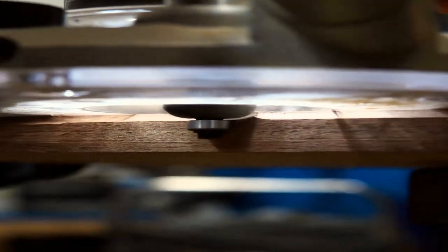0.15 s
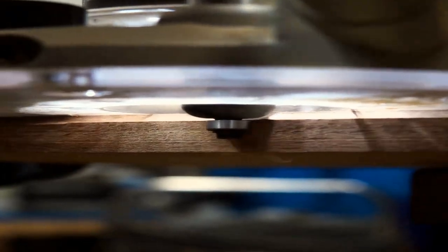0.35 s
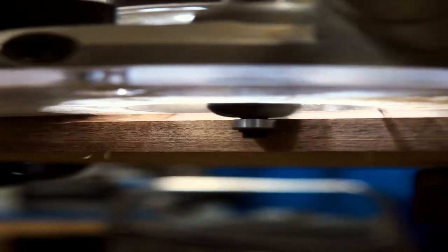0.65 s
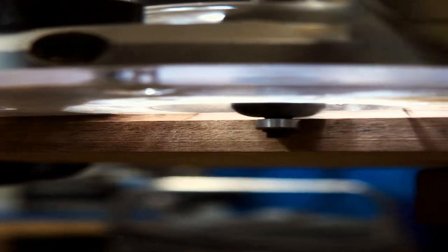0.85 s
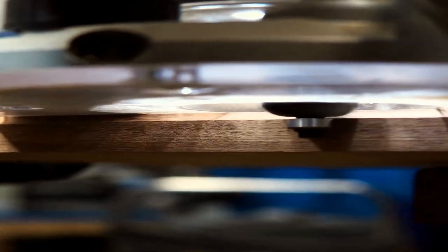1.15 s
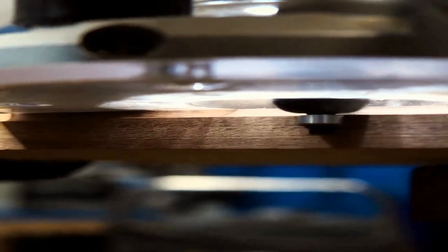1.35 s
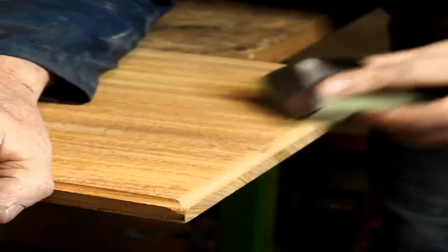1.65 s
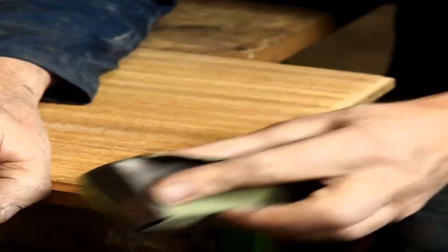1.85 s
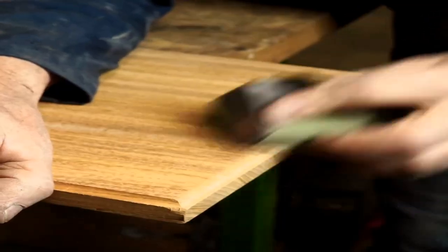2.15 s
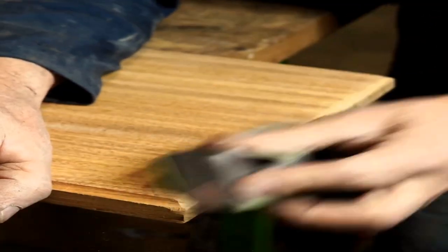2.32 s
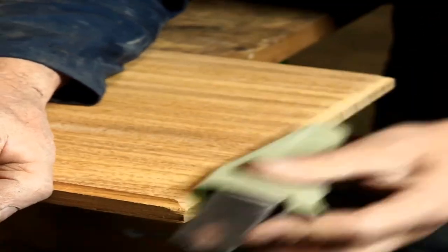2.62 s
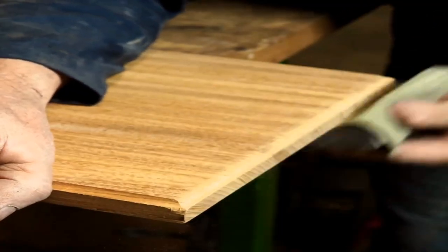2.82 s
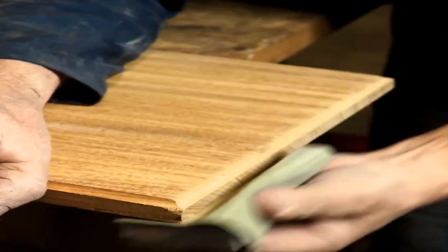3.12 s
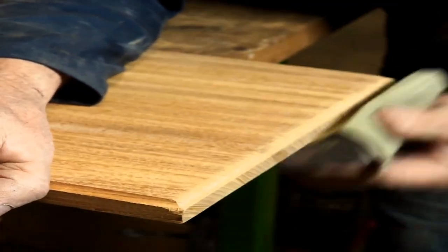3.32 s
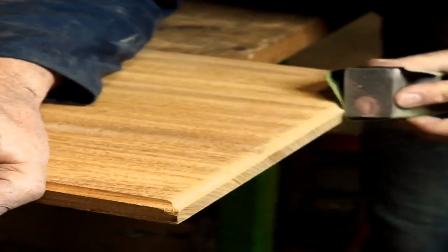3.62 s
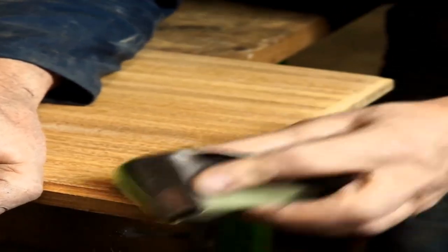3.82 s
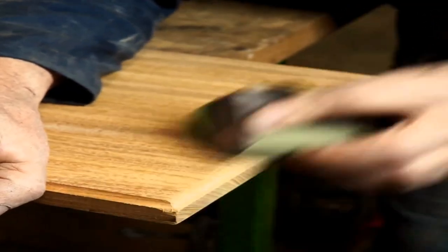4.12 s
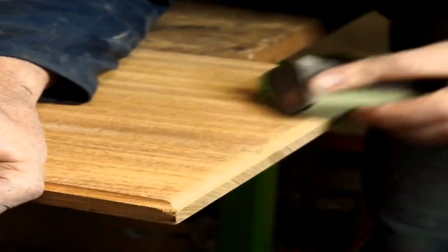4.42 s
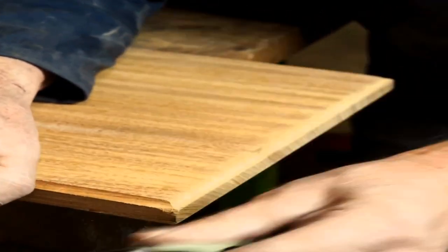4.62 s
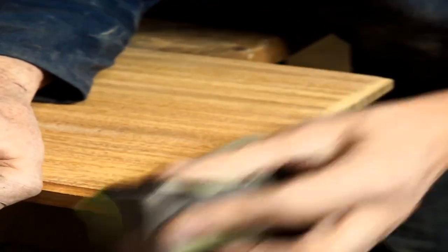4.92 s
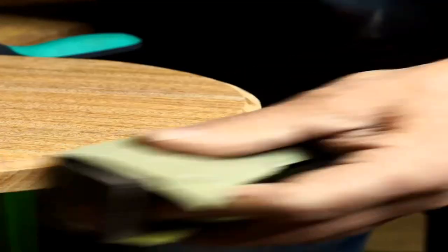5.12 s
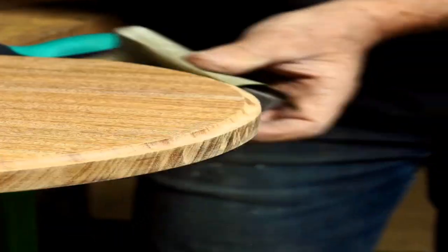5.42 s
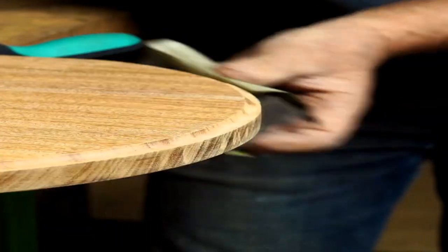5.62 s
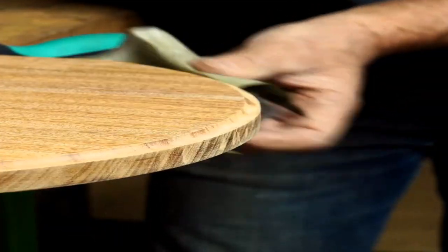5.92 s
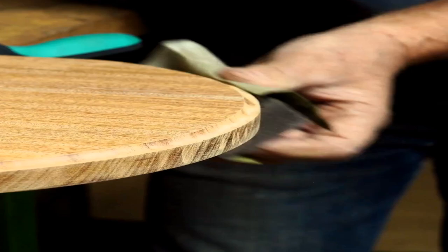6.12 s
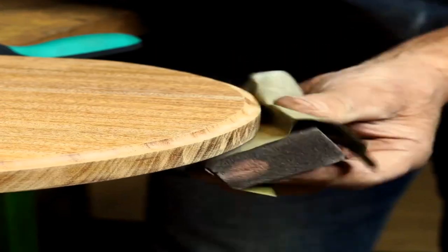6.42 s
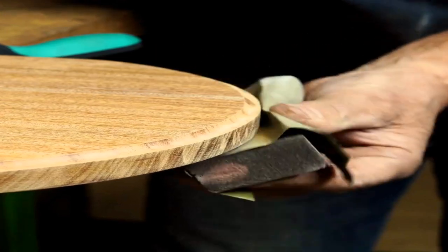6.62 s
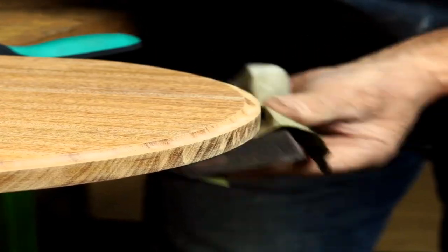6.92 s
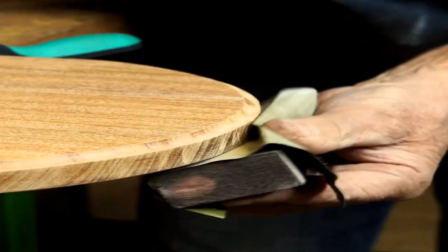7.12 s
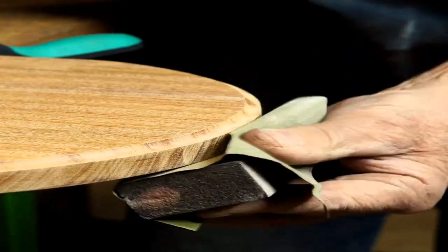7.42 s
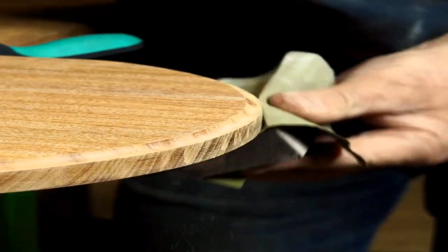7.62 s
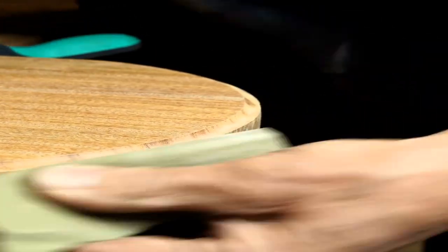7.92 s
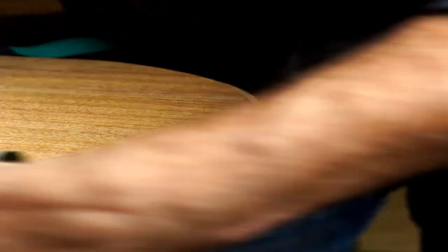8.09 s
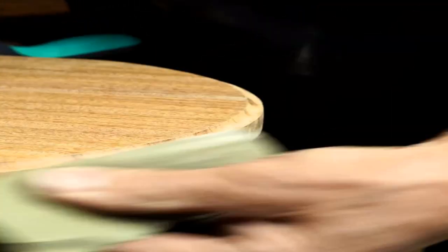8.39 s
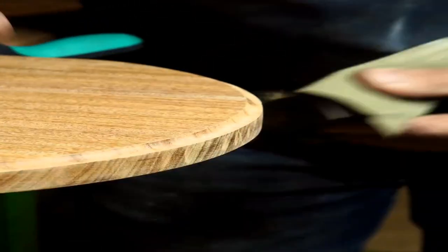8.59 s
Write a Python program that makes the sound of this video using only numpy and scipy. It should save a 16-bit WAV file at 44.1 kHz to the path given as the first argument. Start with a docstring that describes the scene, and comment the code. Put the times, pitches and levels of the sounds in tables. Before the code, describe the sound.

In a quiet workshop with faint low rumble, an electric router whines at a steady pitch with rushing air and buzzing chips, then stops abruptly after about a second. Close up, a sanding block hisses to and fro along a straight wooden edge with soft bumps, then makes quicker, duller, hollow-ringing strokes on a round top, ending with one long sweep and a faint touch.

```python
"""In a workshop with a low rumble, an electric router runs along a wooden edge and stops abruptly.
Then a sanding block rubs to and fro by hand: long hissing strokes on a straight edge, short quick ones
on a round top that rings hollowly, one last long sweep and a light touch.
The router is a stack of spindle harmonics over air noise and pulsed chip clicks; the sanding is random
grain clicks, coloured by paper and wood. The hollow ring glides as the block travels round the curve."""
import sys
import numpy as np
from scipy import signal
from scipy.fft import rfft, irfft, next_fast_len
from scipy.io import wavfile
from scipy.ndimage import uniform_filter1d, map_coordinates

SR = 44100
rng = np.random.default_rng(int(sys.argv[2]) if len(sys.argv) > 2 else 0)


def put_to_file(sound):
    """Save the sound as 16-bit audio at rate SR, in the file named by the first command-line argument."""
    columns = np.atleast_2d(sound).T  # one column per channel
    safe = np.clip(columns, -1, 1)
    whole_steps = np.round(safe * 32767)
    wavfile.write(sys.argv[1], SR, whole_steps.astype(np.int16))


N = 385875
TIME = np.arange(N) / SR   # seconds

# Low rumble of the workshop. Each row: frequency in Hz, relative level in dB per Hz.
RUMBLE_COLOUR = [(15, -40), (30, -12), (80, -7), (200, -7), (400, -14), (1000, -40)]
# Shaking of the bench through the jobs. Each row: time in seconds, relative level in dB.
SHAKE_LEVELS = [(0.0, -79), (.95, -66), (1.15, -59.5), (4.7, -54), (4.82, -51.5), (6.6, -54.5),
                (7.55, -51.5), (7.75, -57), (8.75, -57.5)]
# Low modes of the board on the bench. Each row: frequency in Hz, width in Hz, relative level in dB.
BENCH_MODES = [(75.5, 57, -6), (98.8, 6.5, 4), (138, 29, -7.5)]
# The block bumps the board as it turns.
# Each row: time in seconds, relative thud level in dB, relative scuff level in dB.
BUMPS = [(1.337, -48, -50), (1.74, -35, -59), (1.799, -43, -42.5), (2.02, -48, -46), (2.262, -37, -42),
         (2.801, -29, -47), (3.099, -52, -43.5), (3.18, -34, -60), (3.355, -35, -43.5), (3.745, -35, -37),
         (4.085, -46, -45)]

# Router spindle. Each row: time in seconds, speed in turns per second.
SPINDLE_SPEED = [(0, 240.3), (.15, 240.7), (.3, 240.4), (.77, 240.4), (.92, 239.6), (1.1, 240.3)]
# Lines of motor, fan and cutter, one row for each multiple of the spindle speed from 1 up.
# Each row: relative level alike in both ears in dB, relative level opposed in dB, swell in dB,
# swell period in seconds, loudest moment in seconds, change under the deeper cut in dB.
WHINE_LINES = [(-69.5, -39.0, 3.0, 1.49, 1.0, -5.5), (-45.0, -41.5, 5.0, 1.07, 0.2, -3.5),
               (-40.0, -44.0, 2.5, 1.49, 0.3, 4.0), (-36.5, -31.0, 4.5, 1.49, 0.25, 6.5),
               (-38.0, -40.5, 3.5, 0.62, 0.52, 5.0), (-47.0, -42.5, 3.0, 0.76, 0.67, 14.0),
               (-47.0, -43.0, 4.5, 0.57, 0.03, 0.5), (-42.5, -41.5, 6.0, 1.27, 0.47, 6.5),
               (-43.0, -42.0, 2.0, 0.51, 0.06, -2.0), (-45.0, -45.0, 5.5, 0.47, 0.43, 0.5),
               (-45.0, -46.0, 5.0, 0.59, 0.58, 0.0), (-43.0, -36.0, 5.0, 0.38, 0.2, 0.5),
               (-51.0, -47.0, 4.0, 0.55, 0.21, 8.5), (-40.0, -40.0, 4.0, 0.37, 0.2, -2.5),
               (-45.0, -43.0, 2.5, 1.0, 0.59, 2.5), (-47.0, -39.0, 3.5, 0.42, 0.26, 2.5),
               (-49.0, -42.5, 5.5, 0.84, 0.66, 4.5), (-49.5, -46.0, 2.0, 0.38, 0.18, -3.5),
               (-52.5, -50.5, 4.0, 0.33, 0.19, -1.5), (-54.0, -45.5, 3.5, 0.55, 0.39, -5.0),
               (-49.5, -47.0, 6.0, 1.49, 0.58, 4.0), (-52.5, -53.0, 5.5, 0.89, 0.69, -1.0),
               (-51.0, -57.0, 3.0, 0.25, 0.02, -6.0), (-51.0, -59.0, 5.0, 0.46, 0.24, 0.0)]
# Colour of cooling air and chips. Each row: frequency in Hz, relative level in dB per Hz.
AIR_COLOUR = [(40, -57), (140, -14), (235, -26), (380, -6.5), (580, 0.5), (800, -2), (1250, 2.5),
              (2050, -3.5), (2600, -2), (2950, -7.5), (3300, -1.5), (3700, -10.5), (4400, -6.5), (5000, -2),
              (5600, -7.5), (8000, -8), (9400, -7), (11000, -16.5), (15000, -13)]

# Strokes on the straight edge; each lasts until the next begins. The weak row is the block trailing off # in
# light contact. # Each row: start in seconds, share of the stroke at which it is fastest, then relative levels
# in dB: # rasp, brightness of the rasp, hiss of the grit tips, ring of the board.
STRAIGHT_STROKES = [(1.115, 0.32, -22.5, 2.5, -24, -28), (1.326, 0.44, -20.5, 1, -24, -25.5),
                    (1.562, 0.41, -22, 2.5, -23.5, -32.5), (1.765, 0.5, -20.5, 1, -24, -26.5),
                    (1.997, 0.49, -22.5, 0.5, -21.5, -28.5), (2.196, 0.44, -21, 0.0, -24, -24),
                    (2.414, 0.36, -20.5, 2.5, -27.5, -28.5), (2.612, 0.59, -21, 2.5, -25, -26.5),
                    (2.79, 0.28, -23, 4, -28, -29.5), (2.997, 0.3, -21.5, 2, -28, -28),
                    (3.151, 0.27, -21, 3, -23.5, -27), (3.335, 0.49, -21.5, 0.5, -25.5, -28),
                    (3.524, 0.68, -22.5, 3.5, -23, -27.5), (3.7, 0.49, -21.5, 2.5, -25.5, -27.5),
                    (3.893, 0.38, -21.5, 3, -24, -30), (4.055, 0.4, -21, -0.5, -26, -25.5),
                    (4.421, 0.025, -38.5, -1, -51.5, -36.5), (4.536, 0.27, -22.5, -0.5, -26.5, -25.5)]
# Strokes on the round top: a slow one, a quick run, two long sweeps, a weak row as the block trails off #
# lightly, a light touch. # Each row: start in seconds, share of the stroke at which it is fastest, then
# relative levels in dB: # rasp, brightness of the rasp, hiss of the grit tips, ring of the board.
ROUND_STROKES = [(4.725, 0.27, -28.5, -1.5, -28, -26.5), (5.168, 0.34, -26.5, 0.5, -26.5, -24.5),
                 (5.285, 0.67, -24, -2.5, -24.5, -22.5), (5.376, 0.61, -26.5, -1, -27.5, -22.5),
                 (5.489, 0.5, -26.5, 0, -25, -22), (5.58, 0.66, -25.5, -1.5, -26, -23),
                 (5.679, 0.48, -27.5, -1, -29, -26), (5.787, 0.55, -28, -2, -28, -24.5),
                 (5.899, 0.36, -30, -0.5, -30.5, -25), (6.011, 0.58, -25.5, -1.5, -23.5, -23.5),
                 (6.1, 0.53, -27, -1, -25.5, -20), (6.218, 0.75, -29, -2.5, -25.5, -22.5),
                 (6.328, 0.32, -27, -0.5, -26, -19.5), (6.451, 0.72, -24.5, -2, -25, -18),
                 (6.555, 0.34, -26, -0.5, -24.5, -21.5), (6.685, 0.54, -25, -1.5, -25, -21.5),
                 (6.823, 0.21, -24.5, -1.5, -25, -23), (6.975, 0.61, -22.5, -0.5, -21, -19.5),
                 (7.131, 0.45, -25.5, -1.5, -27, -24.5), (7.272, 0.68, -28.5, 0, -26, -20),
                 (7.888, 0.56, -22.0, -0.5, -24.5, -25), (8.269, 0.05, -38, -1.5, -47, -40.5),
                 (8.45, 0.28, -41.5, -2, -42, -42.5)]
# Colour of paper on wood at each edge. Each row: frequency in Hz, relative level in dB per Hz.
STRAIGHT_COLOUR = [(1900, -2), (2400, 0.5), (4100, 4.5), (5000, -1.5), (8000, -1.5), (9300, -4),
                   (11300, -7), (14000, -8), (15400, -11)]
ROUND_COLOUR = [(1900, 0), (2400, 0), (3500, 0.5), (4800, -3.5), (7000, -6.5), (9100, -10.5),
                (11300, -12.5), (15400, -14)]
# Resonances of board and block, before they glide.
# Each row: frequency in Hz, width in Hz, relative level in dB.
STRAIGHT_MODES = [(1510, 530, 1.5), (1930, 330, 4.5)]
ROUND_MODES = [(1403, 536, -7.5), (1598, 175, 1), (1794, 270, -2)]
# Lower resonances of the board, hollow and low. Each row: frequency in Hz, width in Hz, relative level in dB.
HOLLOW_MODES = [(600, 366, -1.5), (760, 176, 3), (1120, 690, -1.5)]
LOW_MODES = [(313, 43, 1.5), (394, 49, 0), (516, 61, 8)]
# Lower resonances of the board as the work goes on.
# Each row: time in seconds, relative hollow rub in dB, relative low rub in dB.
STRAIGHT_RUB = [(1.1, -40.5, -49), (1.4, -35.5, -50.5), (1.7, -39.5, -49), (2.1, -38.5, -49.5),
                (2.3, -36.5, -48), (2.55, -41, -51), (4.0, -44, -52), (4.33, -37.5, -40), (4.49, -52, -68),
                (4.6, -44, -49.5)]
ROUND_RUB = [(4.74, -41.5, -50), (5.1, -37, -51.5), (5.22, -36, -43), (6.05, -36.5, -44),
             (7.3, -36.5, -46.5), (7.68, -32, -45), (7.8, -36.5, -49.5), (7.87, -38, -47), (7.96, -29, -45),
             (8.2, -42.5, -48), (8.45, -62, -64), (8.75, -53, -66)]
# The hollow between block and board sings as the hand travels round the curve.
# Each row: time in seconds, pitch in Hz, relative level in dB.
HOLLOW_RING = [(4.76, 1669, -31.5), (4.94, 1622, -22.5), (5.1, 1611, -24.5), (5.16, 1000, -46),
               (5.22, 779, -33), (5.35, 956, -39.5), (5.95, 950, -38), (6.2, 1253, -36), (7.0, 1513, -30.5),
               (7.1, 1550, -22), (7.28, 1246, -36), (7.47, 1049, -42), (7.68, 600, -34), (7.8, 400, -46),
               (7.87, 558, -52), (7.93, 676, -28.5), (8.0, 721, -37), (8.025, 1410, -22), (8.13, 1750, -41),
               (8.35, 2010, -55), (8.5, 1930, -55), (8.62, 1860, -46), (8.75, 1830, -54)]

ROUTER_STOP_S, STRAIGHT_END_S, ROUND_END_S = 1.095, 4.74, 8.8
DEEPER_CUT_S = 0.86   # the cutter bites deeper from here on
STUMBLE_S = 0.185   # the odd lines drop out for an instant
LULL_S, LULL_WIDTH_S, LULL_DB = 0.83, 0.023, -5   # lines 3 to 6 dip just before the deeper cut
SWELL_DB, SWELL_PERIOD_S = 8, 0.405   # swell of the faint lines above the table
BEARING_ORDER, BEARING_DB = 10.37, -50   # a bearing sings between two harmonics; relative level
CUTOFF_HZ = 15760   # top of the treble


def from_db(db):
    """Decibels to gain."""
    return 10 ** (np.asarray(db) / 20)


def rms_one(x):
    """Scale to an rms of 1."""
    return x / np.sqrt(np.mean(x ** 2) + 1e-20)


def in_time(rows):
    """Each column of a curve, sample by sample."""
    s, *columns = np.transpose(rows)
    return [np.interp(TIME, s, c) for c in columns]


def between(start, end):
    """One inside the span, with 10 ms ramps at its ends."""
    return np.clip(np.minimum(TIME - start, end - TIME) / .01 + .5, 0, 1)


def drift(rate):
    """Smooth chance with a spread of 1, changing about rate times a second."""
    r = np.exp(-200 * np.pi * rate / SR)   # one step per 100 samples
    noise = rng.standard_normal(N // 100 + 1002)
    slow = signal.lfilter([1], [1, -2 * r, r * r], noise)[1000:]   # drop the filter's start
    return np.interp(np.arange(N) / 100, np.arange(len(slow)), rms_one(slow))


def band(x, low_hz, high_hz, order=2):
    """Butterworth band-pass."""
    edges = [low_hz, min(high_hz, .47 * SR)]
    return signal.sosfilt(signal.butter(order, edges, "band", fs=SR, output="sos"), x)


def coloured(x, spectrum):
    """Shape a sound with a curve of (Hz, dB) points; the highest treble stays level."""
    hz, db = np.transpose(spectrum)
    size = next_fast_len(N)
    bins = np.clip(np.fft.rfftfreq(size, 1 / SR), 1, 14500)
    gain = from_db(np.interp(np.log(bins), np.log(hz), db))
    return irfft(rfft(x, size) * gain, size)[..., :N]


def register(x, low_hz, high_hz):
    """One slice of the spectrum with soft edges, so that neighbouring slices join without a gap."""
    size = next_fast_len(N)
    edges = np.outer([low_hz, high_hz], [.92, 1.08]).ravel()
    gain = np.interp(np.fft.rfftfreq(size, 1 / SR), edges, [0, 1, 1, 0])
    return irfft(rfft(x, size) * gain, size)[..., :N]


def resonate(x, modes):
    """Parallel two-pole resonances of (Hz, width, dB), signs alternating."""
    out = 0
    for k, (hz, width, db) in enumerate(modes):
        r = np.exp(-np.pi * width / SR)
        poles = [1, -2 * r * np.cos(2 * np.pi * hz / SR), r * r]
        gain = (-1) ** k * from_db(db) * (1 - r * r) / 2
        out = out + gain * signal.lfilter([1, 0, -1], poles, x + 1e-18)
    return out


def gliding(x, octaves):
    """Shift a ringing sound up and down in pitch by reading it faster or slower."""
    place = np.cumsum(2 ** octaves) % (N - 1)
    return np.array([map_coordinates(ear, [place], order=3) for ear in x])


def grit(per_s, spread_db):
    """Grains catch and tear fibres: random clicks, mostly small, a few large; one stream for each ear."""
    sizes = from_db(spread_db * np.minimum(rng.exponential(1, (2, N)), 4))
    sizes = sizes * rng.choice([-1, 1], (2, N))
    caught = rng.random((2, N)) < per_s / SR
    return rms_one(sizes * caught / np.sqrt(per_s))


def bench(bump_db, shake_db, lumpy_db, rumble_db):
    """Uneven pushes and soft bumps wake the bench's low modes, over a steady rumble."""
    pushes = np.zeros(N)
    for s, db, _ in BUMPS:
        pushes[int(s * SR)] = from_db(db)
    # resonating twice makes a soft contact: it swells before it fades
    thuds = resonate(resonate(pushes, BENCH_MODES[-1:]), BENCH_MODES[-1:])
    thuds *= pushes.max() / np.abs(thuds).max()
    shoves = rng.standard_normal((2, N)) + 0.22 * rng.standard_normal(N)
    shoves = shoves * from_db(lumpy_db * drift(5.6))
    shake_gain = from_db(in_time(SHAKE_LEVELS)[0] + shake_db)
    shake = shake_gain * rms_one(band(resonate(shoves, BENCH_MODES), 34, 260))
    rumble = rms_one(coloured(rng.standard_normal((2, N)), RUMBLE_COLOUR))
    return from_db(bump_db) * thuds + shake + from_db(rumble_db) * rumble


def workshop(x, wet_db, t60):
    """A weak, dull tail from the walls: decaying band-passed noise, t60 in seconds."""
    t = np.arange(SR // 2) / SR
    tail = band(rng.standard_normal((2, len(t))), 210, 6500, order=1) * from_db(-60 * t / t60)
    tail = rms_one(tail) / np.sqrt(len(t))
    return x + from_db(wet_db) * signal.fftconvolve(x, tail, axes=1)[:, :N]


def scattered(x, longest_s, travel_s, count=7):
    """Echoes off bench, hand and tools, others for each ear; their paths change as the source moves."""
    out = np.zeros((2, N))
    for ear in range(2):
        for delay in rng.uniform(0, longest_s, count):
            lag = np.round((delay + travel_s * drift(2.0)) * SR).astype(int)
            out[ear] += rng.choice([-1, 1]) * x[(np.arange(N) - lag) % N]
    return rms_one(out)


def whine(turns, load, waver, waver_per_order, top_db, top_fall_db):
    """Spindle harmonics swell and fade as the tool travels through its own reflections; a bearing holds
    between them. All waver, the high ones most; the harmonics in the table answer to the load."""
    lines = [(k, *row) for k, row in enumerate(WHINE_LINES, 1)]
    lines.append((BEARING_ORDER, BEARING_DB, BEARING_DB, 0, 1, 0, 0))
    for n, k in enumerate(range(25, 52)):   # faint lines above the table
        faint_db = top_db - top_fall_db * n
        lines.append((k, faint_db, faint_db, SWELL_DB, SWELL_PERIOD_S, rng.random(), 0))
    size = int((ROUTER_STOP_S + .1) * SR)
    t, out = TIME[:size], np.zeros((2, N))
    lull_db = LULL_DB * np.exp(-((t - LULL_S) / LULL_WIDTH_S) ** 2)
    for k, alike_db, opposed_db, swell_db, period_s, loudest_s, cut_db in lines:
        db = swell_db * np.cos(2 * np.pi * (t - loudest_s) / period_s)
        db = db + cut_db * load[:size] + lull_db * (2 < k < 7)
        line = np.sqrt(2) * from_db(db) * np.exp(2j * np.pi * (k * turns[:size] + rng.random()))
        if k % 2 == 1:
            line = line * np.tanh((t - STUMBLE_S) / .01)   # passes through silence
        depth = waver + waver_per_order * k
        wander = drift(13.0)[:4 * size].reshape(4, size)
        wavering = 1 + depth * (wander[:2] + 1j * wander[2:])
        mid, side = line * wavering / np.sqrt(1 + 2 * depth ** 2)
        out[:, :size] += from_db(alike_db) * mid.real + from_db(opposed_db) * side.imag * [[1], [-1]]
    return out


def router(whine_db, air_db, chip_db, bite, cut_bite, air_sag_db, load_s, fade_s):
    """A whine over fan air; the two cutter flutes throw chips twice a turn.
    Under a deeper cut they bite harder and the air sinks."""
    turns = np.cumsum(in_time(SPINDLE_SPEED)[0]) / SR
    load = np.clip((TIME - DEEPER_CUT_S) / load_s + .5, 0, 1)
    lines = whine(turns, load, waver=.17, waver_per_order=0.024, top_db=-53.5, top_fall_db=0.8)
    air = rms_one(coloured(rng.standard_normal((2, N)), AIR_COLOUR))
    air = from_db(air_db - air_sag_db * load) * air
    flutes = np.exp((bite + cut_bite * load) * np.cos(4 * np.pi * turns))
    flutes = flutes / np.sqrt(uniform_filter1d(flutes ** 2, size=1100))   # same power at any bite
    cuts = grit(9000, spread_db=7.0) * flutes
    feed_db = 1.3 * drift(2.5)   # the feed is uneven
    chips = from_db(chip_db + feed_db) * rms_one(coloured(cuts, AIR_COLOUR))
    running = np.clip((ROUTER_STOP_S - TIME) / fade_s + .5, 0, 1)
    return (from_db(whine_db) * lines + air + chips) * running


def hand_motion(strokes, end_s, pivot_s):
    """The hand swings like a pendulum; in quick strokes the block keeps creeping as it turns.
    Gives the stroke in progress, the share of it done, the speed (0-1) and the place (s of travel)."""
    starts, fastest = np.transpose(strokes)[:2]
    k = np.maximum(np.searchsorted(starts, TIME) - 1, 0)
    length = np.diff(starts, append=end_s)[k]
    peak_at = np.clip(fastest, .05, .95)[k]
    done = np.clip((TIME - starts[k]) / length, 0, 1)
    swing = np.sin(np.pi / 2 * np.minimum(done / peak_at, (1 - done) / (1 - peak_at)))
    creep = np.clip(pivot_s / length, 1e-3, 1)
    place = np.where(k % 2, -length, length) * np.cos(np.pi * done)   # every other stroke goes back
    return k, done, creep + (1 - creep) * swing, place


def stroke_gains(strokes, motion, powers, db_per_s_of_travel, brighten, flank_db, ease_s):
    """Ring, dark, middle and bright rasp, hiss: stroke strength times a power of the speed, sloped along
    the edge. The rasp tips from dark to bright with the stroke's brightness and with speed."""
    k, _, speed, place = motion
    rasp_db, bright_db, hiss_db, ring_db = np.transpose(strokes)[2:, k]
    rasp, hiss, ring = [from_db(db + slope * place) * speed ** power
                        for db, power, slope in zip((rasp_db, hiss_db, ring_db), powers, db_per_s_of_travel)]
    tilt = from_db(bright_db) * speed ** brighten
    flank = rasp * from_db(flank_db)
    ease = max(int(ease_s * SR), 1)
    return [uniform_filter1d(gain, ease) for gain in (ring, flank / tilt, rasp, flank * tilt, hiss)]


def ring_glide(motion, sag_octaves, wander_octaves):
    """The ring sinks through each stroke and wanders as the grip shifts."""
    return sag_octaves * (.5 - motion[1]) + wander_octaves * drift(4)


def sanding(gains, colour, modes, glide, ring_db, rasp_db, hiss_db, grains_per_s, diffuse_db,
            judder_db, ring_waver_db):
    """Faster strokes catch more grains; they set the board ringing, rasp in three registers and hiss."""
    ring_gain, dark_gain, rasp_gain, bright_gain, hiss_gain = gains
    per_s = grains_per_s * np.sqrt(rasp_gain / rasp_gain.max())
    grains = grit(per_s, spread_db=2.0)
    echoes = scattered(grains[0], longest_s=.007, travel_s=.0002)
    scrape = coloured(echoes + from_db(diffuse_db) * grit(per_s, spread_db=7.5), colour)
    rasp = 0
    for gain, low_hz, high_hz in [(dark_gain, 1900, 3100), (rasp_gain, 3100, 4700), (bright_gain, 4700, 7000)]:
        rasp = rasp + gain * from_db(0.43 * drift(18)) * rms_one(register(scrape, low_hz, high_hz))
    tips = register(scrape, 7000, 10500)
    tips = tips + register(scrape, 10500, 16500) * from_db(1.6 * drift(10))   # the treble flickers
    ring = rms_one(gliding(band(resonate(grains, modes), 730, 1970), glide))
    ring = ring * from_db(ring_waver_db * drift(24))
    paper = from_db(ring_db) * ring_gain * ring + from_db(rasp_db) * rasp
    paper = paper + from_db(hiss_db) * hiss_gain * rms_one(tips)
    return paper * from_db(judder_db * drift(41))   # the paper grips unevenly


def rubbing(levels, motion, push_at, hollow_db, low_db, hollow_push_db, low_push_db, judder_db):
    """The dragging block drives the board's lower resonances, most where in the stroke the hand pushes."""
    hollow_level, low_level = in_time(levels)
    push = np.cos(2 * np.pi * (motion[1] - push_at))
    drag = grit(5000, spread_db=5.0)
    hollow = rms_one(band(resonate(drag, HOLLOW_MODES), 505, 1100))
    low = rms_one(band(resonate(drag, LOW_MODES), 120, 520))
    out = from_db(hollow_level + hollow_db + hollow_push_db * push) * hollow
    out += from_db(low_level + low_db + low_push_db * push) * low
    return out * from_db(judder_db * drift(6.7))


def scuffs(level_db, rise_s):
    """Where the block bumps the board it also drags heavily for a moment: a short, low scuff."""
    press = 0
    for s, _, db in BUMPS:
        age = np.maximum(TIME - s + rise_s / 2, 0) / rise_s
        press = press + from_db(db + level_db) * age * np.exp(1 - age)
    return press * rms_one(band(grit(3000, spread_db=9.0), 293, 483))


def hollow_ring(level_db, width_hz, judder_db):
    """Grains excite one resonance whose pitch follows the block on the curve; its width is given at 1 kHz."""
    hz, db = in_time(HOLLOW_RING)
    ring = resonate(grit(7000, spread_db=4.0), [(1000, width_hz, 0)])
    ring = gliding(band(ring, 700, 1400), np.log2(hz / 1000))
    return from_db(db + level_db + judder_db * drift(20)) * rms_one(ring)


def straight_edge():
    """Long, bright strokes; the board's ring hardly follows the speed."""
    motion = hand_motion(STRAIGHT_STROKES, STRAIGHT_END_S, pivot_s=0.061)
    # powers and slopes are for rasp, hiss, ring
    gains = stroke_gains(STRAIGHT_STROKES, motion, powers=(.89, 1.67, .33), db_per_s_of_travel=(.15, 3.3, 2.0),
                         brighten=0.34, flank_db=-2.0, ease_s=0.012)
    glide = ring_glide(motion, sag_octaves=.06, wander_octaves=.07)
    paper = sanding(gains, STRAIGHT_COLOUR, STRAIGHT_MODES, glide, ring_db=-4.0, rasp_db=-2.03, hiss_db=3.5,
                    grains_per_s=14000, diffuse_db=-7.5, judder_db=0.5, ring_waver_db=0.7)
    wood = rubbing(STRAIGHT_RUB, motion, push_at=0.13, hollow_db=0.0, low_db=1.0,
                   hollow_push_db=2.4, low_push_db=2.5, judder_db=1.8)
    return (paper + wood + scuffs(level_db=0, rise_s=0.016)) * between(ROUTER_STOP_S, STRAIGHT_END_S)


def round_top():
    """Duller strokes on the curve, where the hollow ring swells with each one."""
    motion = hand_motion(ROUND_STROKES, ROUND_END_S, pivot_s=0.014)
    gains = stroke_gains(ROUND_STROKES, motion, powers=(.6, .84, .63), db_per_s_of_travel=(-7.7, -12.6, -3.4),
                         brighten=0.015, flank_db=-0.95, ease_s=0.02)
    glide = ring_glide(motion, sag_octaves=.09, wander_octaves=0.028)
    paper = sanding(gains, ROUND_COLOUR, ROUND_MODES, glide, ring_db=-4.46, rasp_db=-2.27, hiss_db=-2.0,
                    grains_per_s=9100, diffuse_db=-7.5, judder_db=0.96, ring_waver_db=1.0)
    wood = rubbing(ROUND_RUB, motion, push_at=0.34, hollow_db=-4.0, low_db=-1.8,
                   hollow_push_db=3.0, low_push_db=0.1, judder_db=2.0)
    hollow = hollow_ring(level_db=-2, width_hz=190, judder_db=1.3) * motion[2] ** 0.32   # swells with speed
    return (paper + wood + hollow) * between(STRAIGHT_END_S, np.inf)


def scene():
    """Router, straight edge, round top, one after the other, over the bench and its rumble."""
    background = bench(bump_db=-11.0, shake_db=-0.5, lumpy_db=3, rumble_db=-63)
    machine = router(whine_db=0.8, air_db=-28.0, chip_db=-27.5, bite=0.27, cut_bite=.25,
                     air_sag_db=4.5, load_s=0.04, fade_s=.04)
    hand = workshop(straight_edge() + round_top(), wet_db=-7.0, t60=0.19)
    return background + machine + hand


def record(dry):
    """The microphone has a narrow dip in the treble; the top is cut."""
    heard = dry - resonate(dry, [(8450, 190, 4)])
    return signal.sosfilt(signal.ellip(12, .1, 80, CUTOFF_HZ, fs=SR, output="sos"), heard)


dry = scene()
out = record(dry)
put_to_file(out)
```